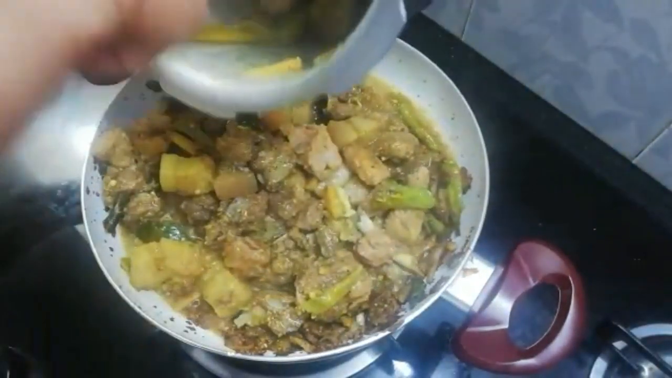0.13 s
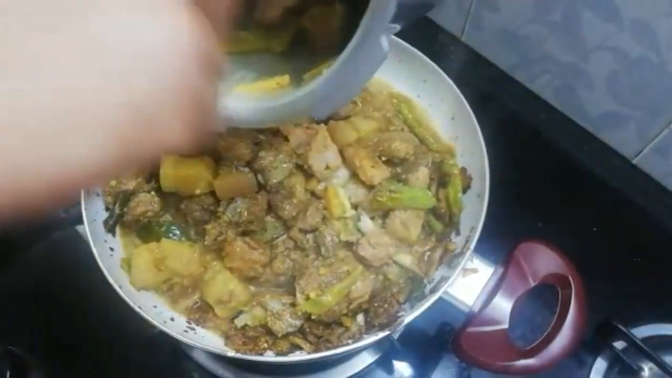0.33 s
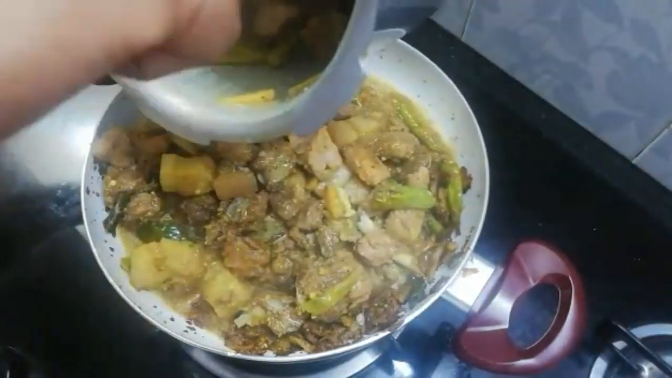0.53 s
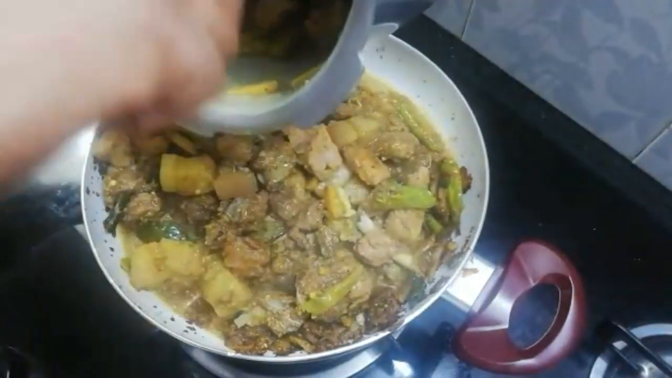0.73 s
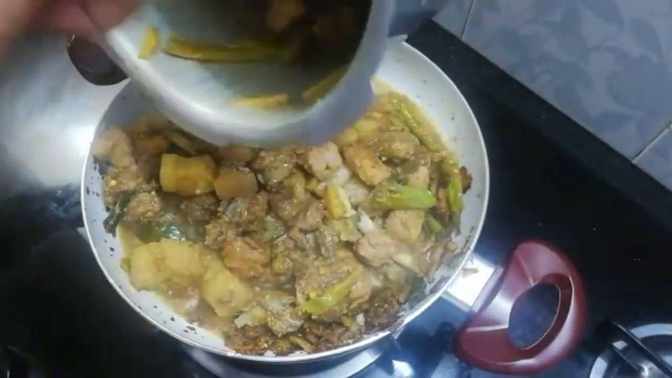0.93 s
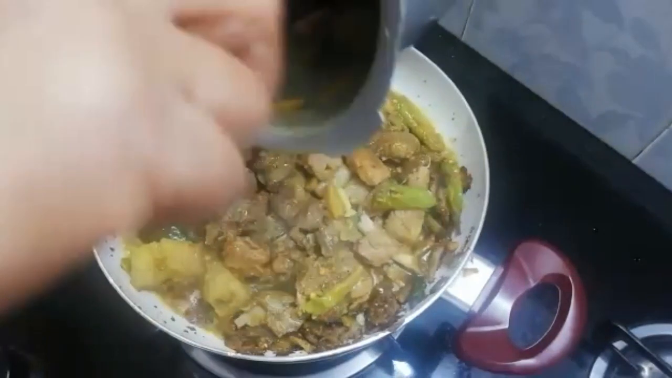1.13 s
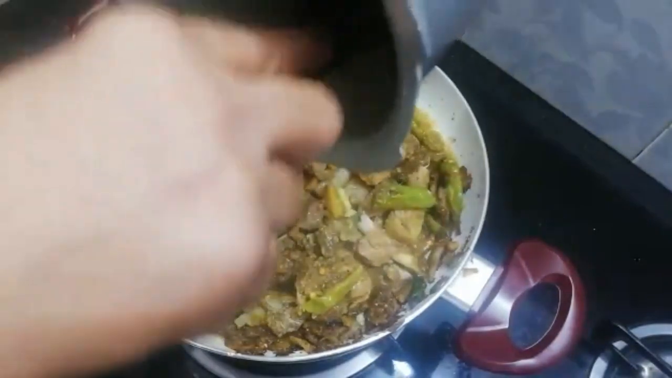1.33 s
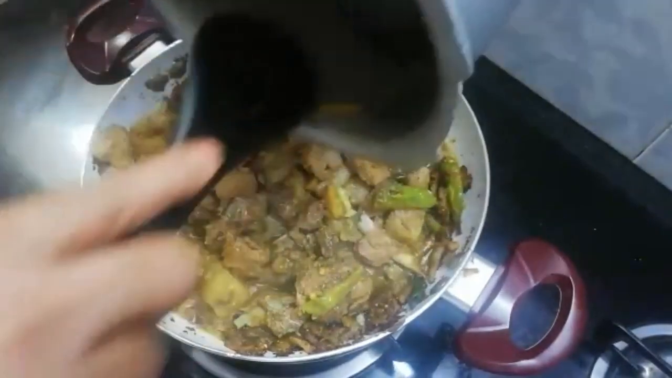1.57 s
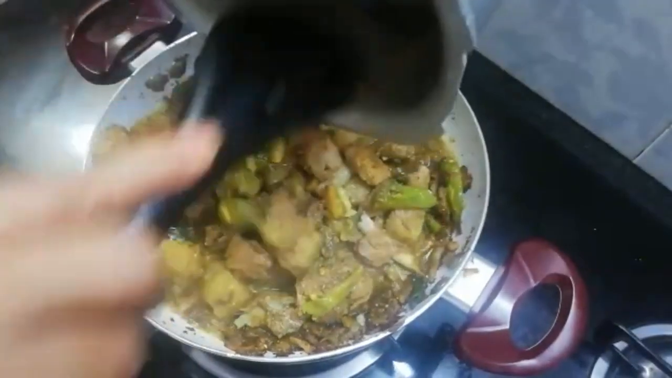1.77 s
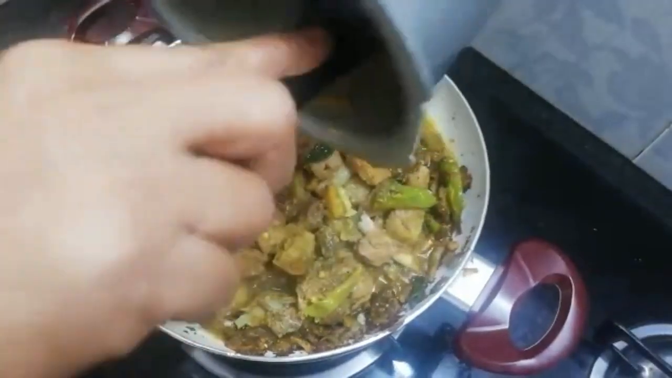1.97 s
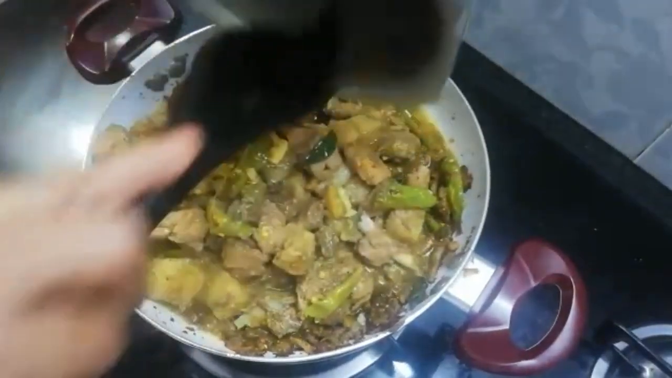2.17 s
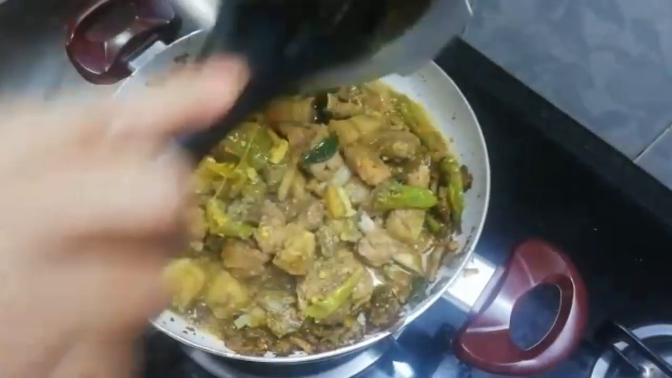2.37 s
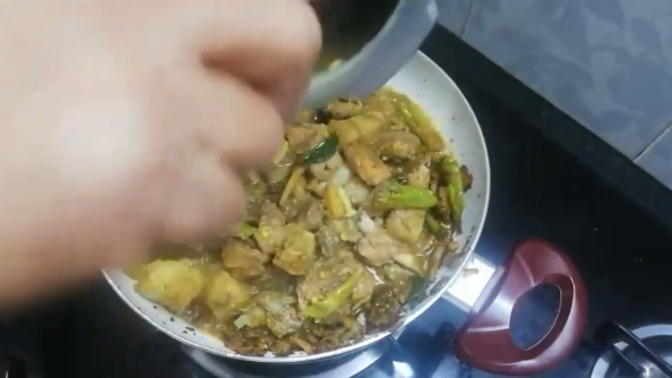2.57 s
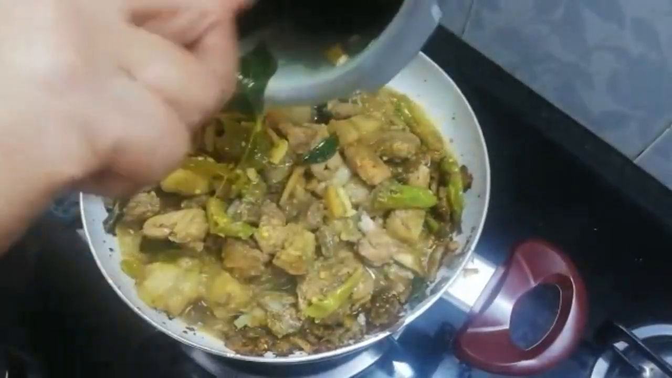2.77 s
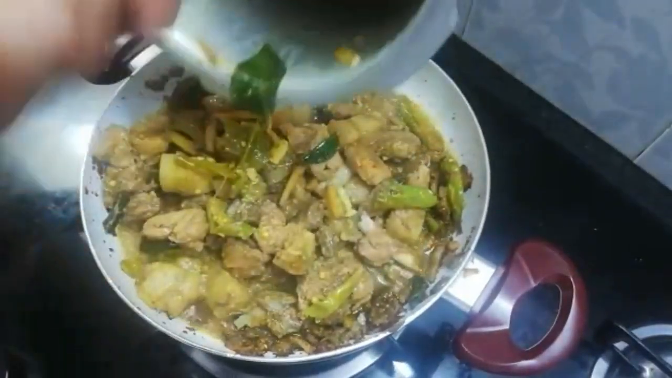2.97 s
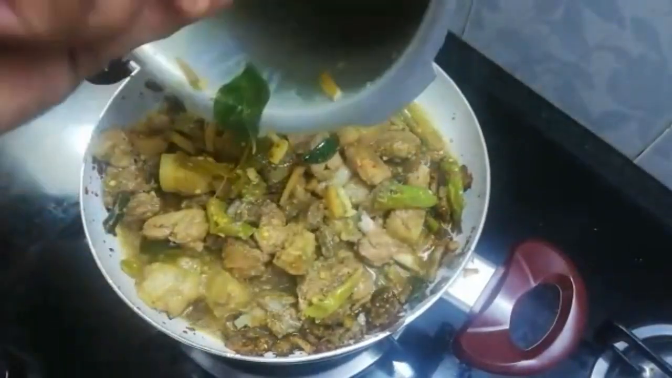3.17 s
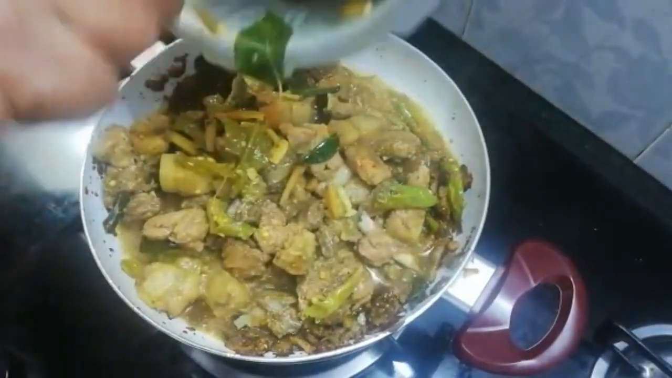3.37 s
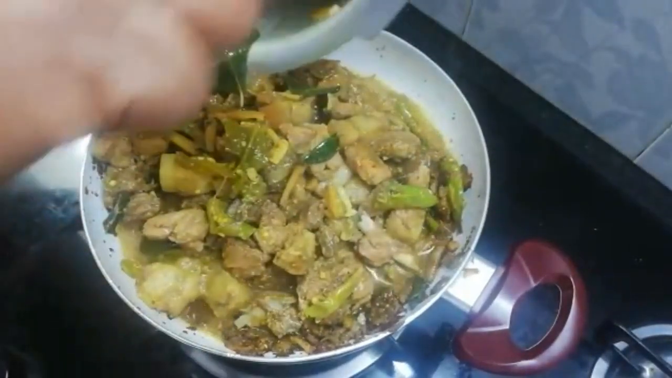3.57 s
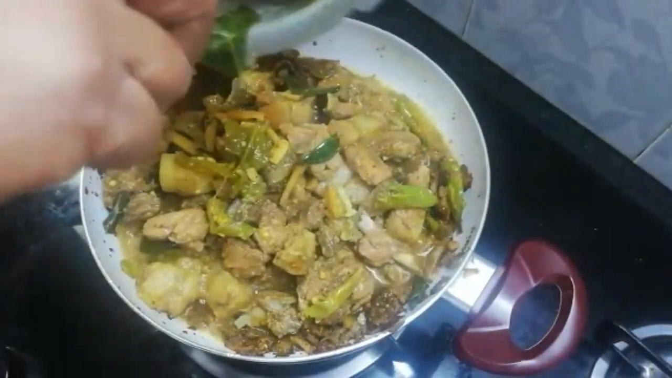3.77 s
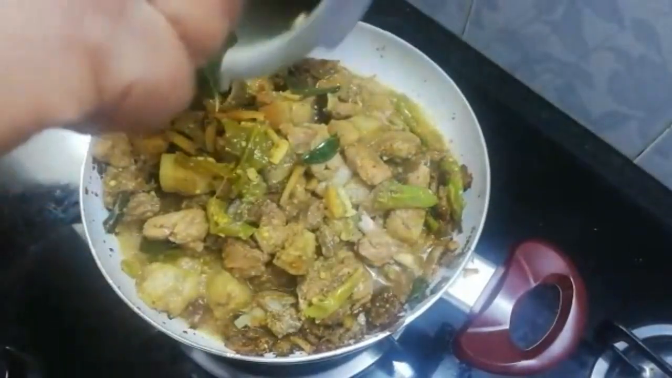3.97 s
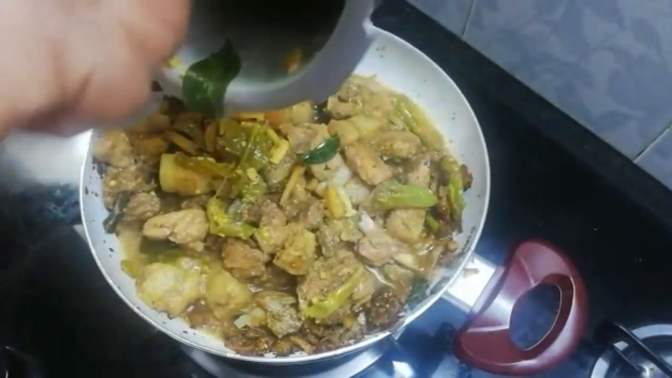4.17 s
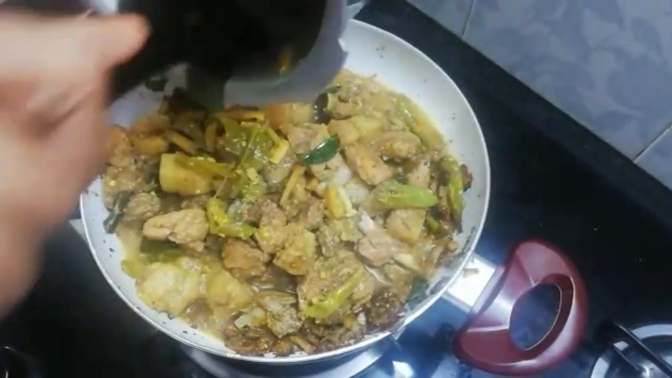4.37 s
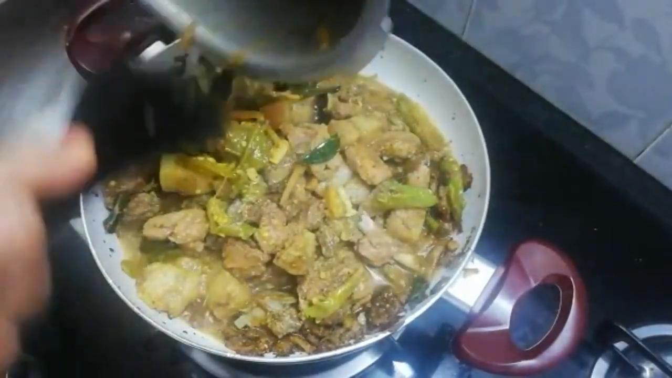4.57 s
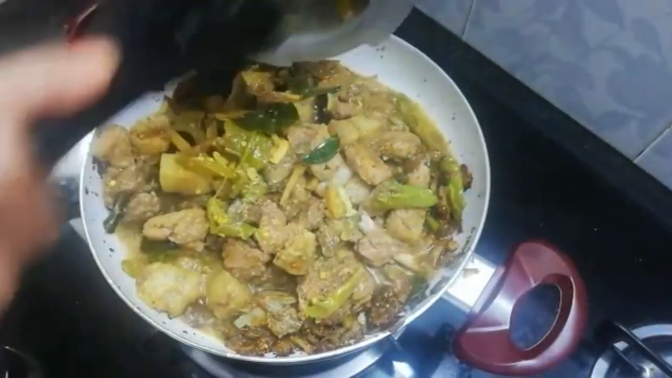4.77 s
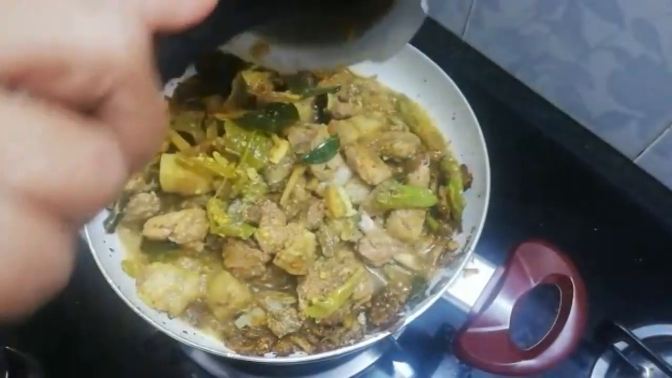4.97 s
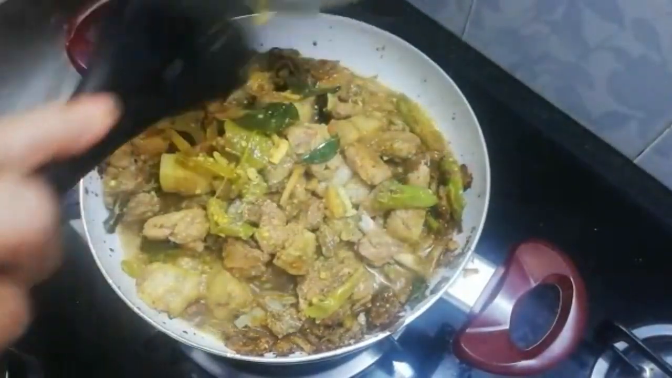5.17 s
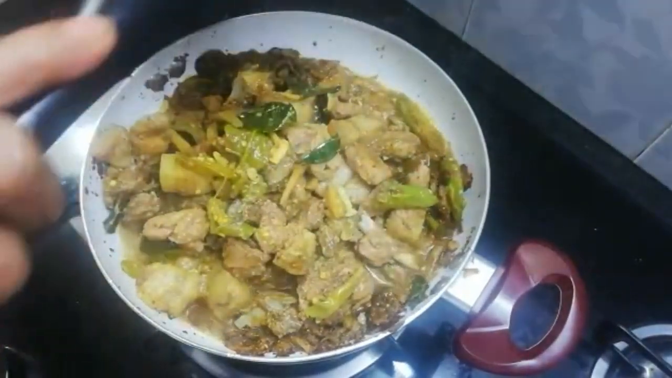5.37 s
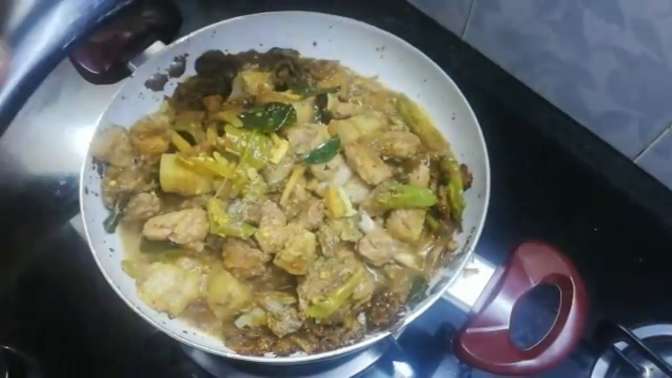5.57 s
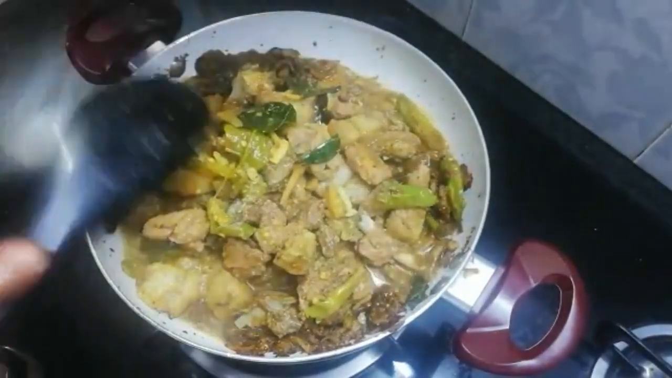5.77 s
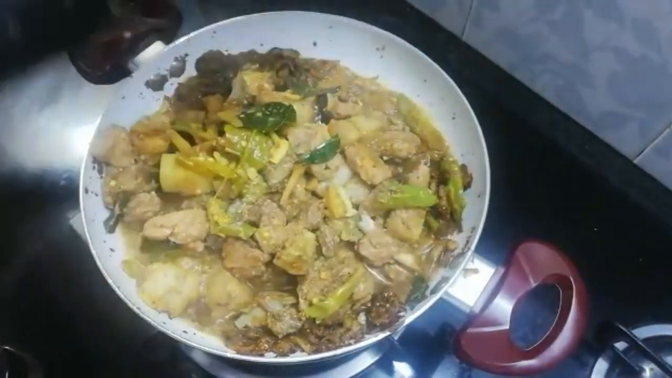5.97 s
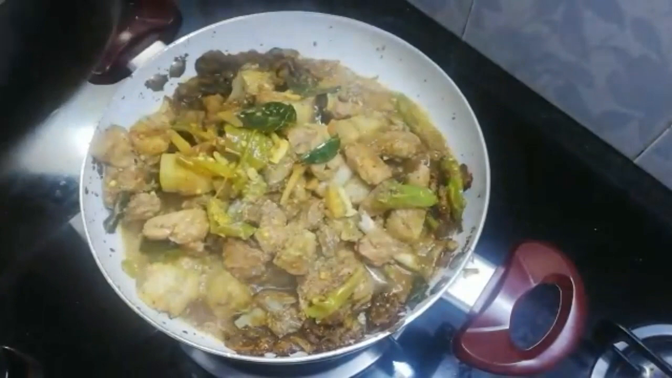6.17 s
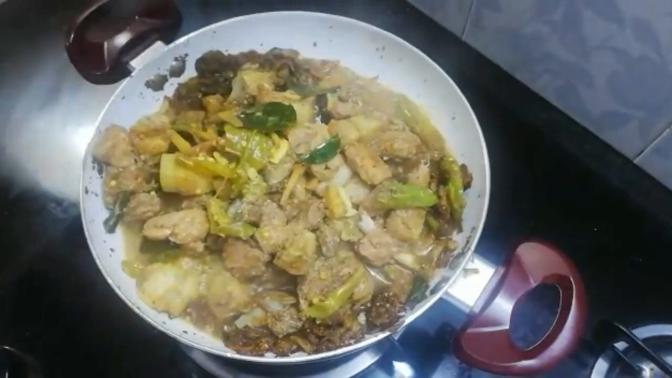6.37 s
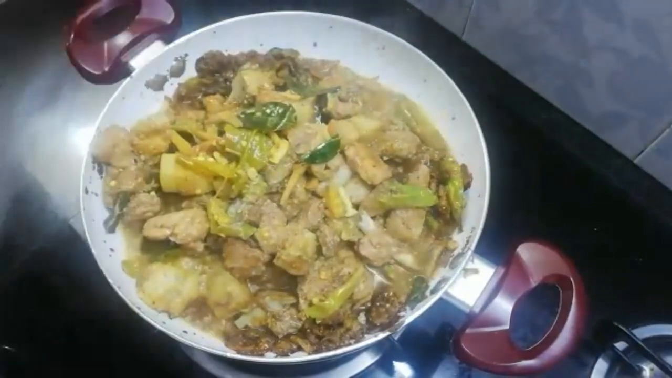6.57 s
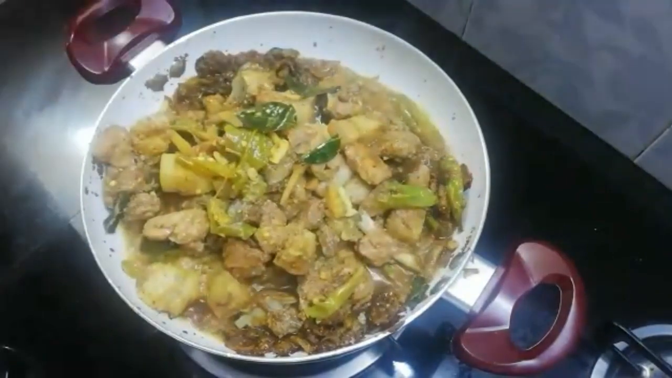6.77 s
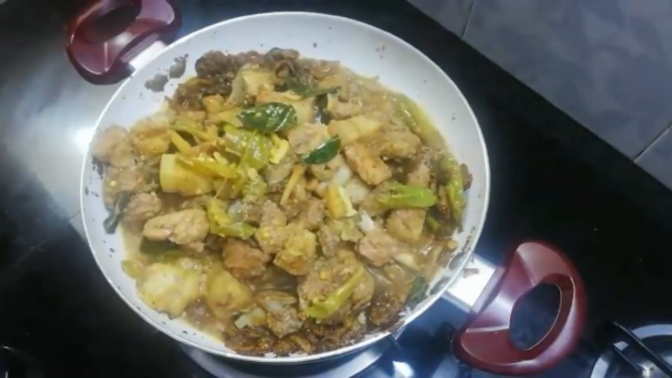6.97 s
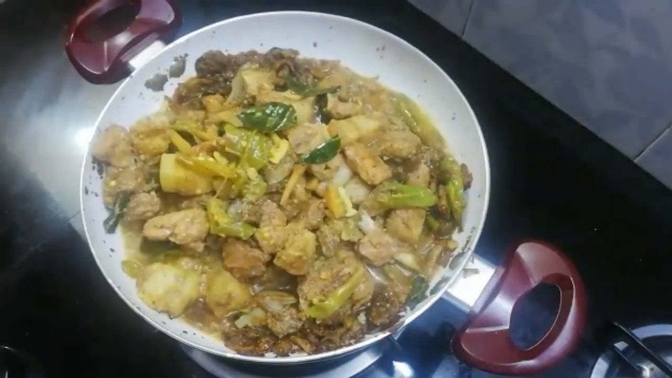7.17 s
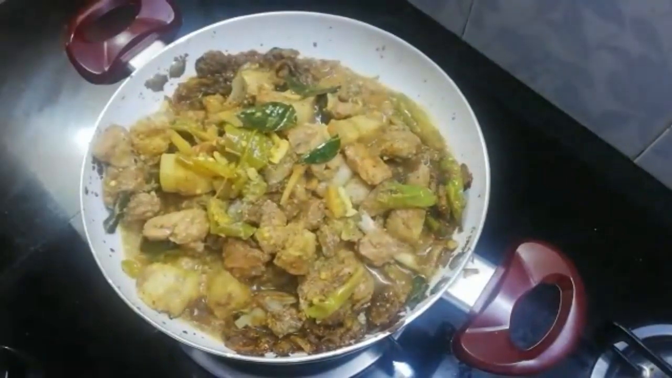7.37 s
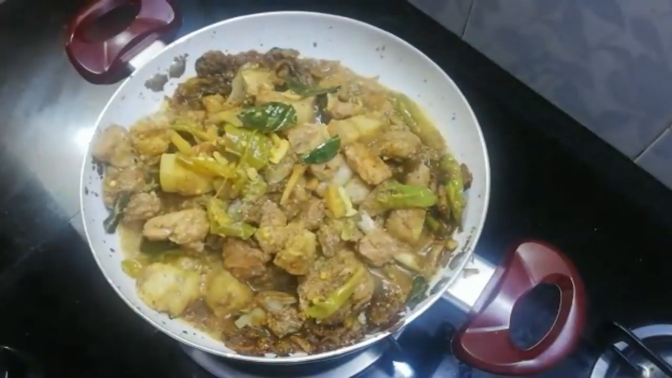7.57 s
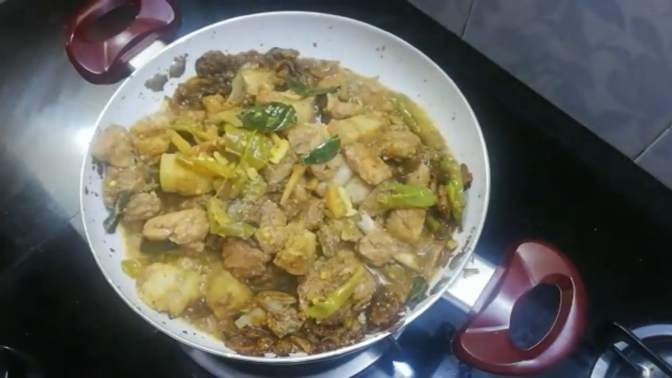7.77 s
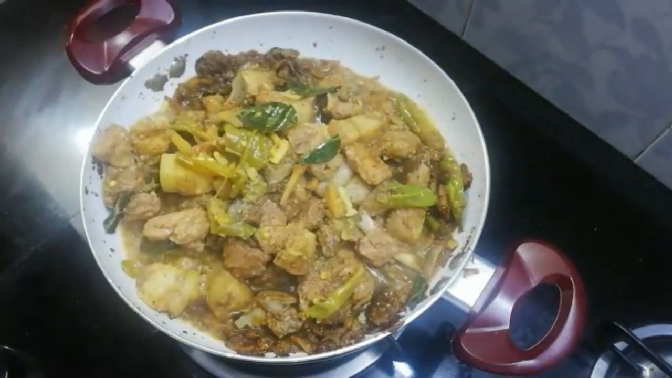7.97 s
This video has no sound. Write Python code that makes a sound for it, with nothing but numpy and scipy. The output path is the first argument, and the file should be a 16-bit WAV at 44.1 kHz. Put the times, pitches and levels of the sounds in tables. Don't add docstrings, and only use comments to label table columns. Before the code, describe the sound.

A close handheld stereo pickup hears a pan frying, hissing and spitting, with a low murmur of flame underneath. Over it, a ladle empties a hand-damped metal pot: rasping scrapes, sharp taps, short squeaky singing tones, clustered and irregular. The pot then lands on the counter with a clear clang, followed by a quick fierce hiss and quieter sizzling in the tiled room.

```python
import sys
import numpy as np
from scipy import signal
from scipy.fft import rfft, irfft, next_fast_len
from scipy.io import wavfile
from scipy.ndimage import uniform_filter1d, map_coordinates

SR = 44100
rng = np.random.default_rng(int(sys.argv[2]) if len(sys.argv) > 2 else 0)


def to_wav(s):
    ch = np.atleast_2d(s).T
    pcm = np.round(np.clip(ch, -1, 1) * 32767)
    wavfile.write(sys.argv[1], SR, pcm.astype(np.int16))


def voltage_ratio(decibels):
    exponent = np.asarray(decibels, float) / 20
    return 10 ** exponent


N = 353285

BAND_HZ = [550, 1800, 4900, 9500]

# start_s, level_db
HEAT = [(0.0, -42), (0.24, -30), (0.42, -36), (0.76, -29.5), (0.89, -31.5), (1.43, -35.5), (1.69, -33),
        (2.9, -35.5), (4.46, -35.5), (4.93, -36.5), (5.89, -37.5), (6.09, -38.5), (6.94, -37.5), (7.3, -39),
        (8.01, -39.5)]
# pitch_hz, level_db (per Hz)
FIZZ_COLOUR = [(180, -16), (300, -4.5), (385, -12), (585, -9), (726, -11), (764, -5.5), (997, -7.5),
               (1220, -4), (1940, -6), (2220, -6), (5030, -4), (5650, -5.5), (9170, 0.5), (15100, -15.5),
               (16200, -28)]
# start_s, level_db
FLARE = [
    (7.25, -59),
    (7.348, -29.5),
    (7.522, -26.5),
    (7.602, -30.5),
    (7.75, -47),
]
# pitch_hz, level_db (per Hz)
FLARE_COLOUR = [(290, -49), (500, -16), (587, -16.5), (1050, -11.5), (1580, -4.5), (3170, -8), (3510, -9),
                (4240, -13), (7370, -11), (9440, -2.5), (16200, -27)]
# pitch_hz, likeness (0-1)
LIKENESS = [(60, 0.91), (130, 0.97), (290, 0.77), (640, 0.037), (1410, 0.54), (3100, 0.087), (6820, 0.2),
            (15000, 0.18)]
# pitch_hz, level_db (per Hz)
RUMBLE_COLOUR = [(12, -47), (20, -14.5), (97, -8), (183, -2), (232, -15.5), (267, -15), (351, -22.5),
                 (380, -55), (405, -46), (450, -37), (580, -56), (990, -120)]
# start_s, level_db
SIMMER = [(0.0, -54), (0.89, -50), (1.47, -55), (1.78, -47), (2.07, -53.5), (5.78, -50), (6.07, -55),
          (6.6, -50), (8.01, -53.5)]

# firmest_s, release_s, pressure_db,
# depth (0 wall - 1 floor), edge_db (sharp edge above 0, flat bowl below)
STROKES = [(0.003, 0.03, -12, 0.33, -0.5), (0.033, 0.032, -25.5, 0.73, -2.5),
           (0.065, 0.05, -13.5, 0.058, -4.5), (0.392, 0.068, -21.5, 0.089, -6),
           (0.424, 0.021, -27, 0.68, 3), (0.54, 0.041, -40.5, .6, -11.5), (0.632, 0.069, -29, 0.49, 4),
           (0.774, 0.13, -32.5, 0.62, 2), (0.93, 0.13, -32.5, .1, 14), (1.076, 0.062, -29.5, 0.6, -3.5),
           (3.343, 0.027, -13, 0.2, 1), (3.383, 0.026, -15, 0.07, 9), (3.7, 0.049, -42, 0.97, 1),
           (3.736, 0.055, -28.5, 0.66, -6.5), (3.775, 0.13, -34, 0.61, -1), (4.142, 0.042, -30.5, 0.65, 5),
           (4.372, 0.2, -33.5, 0.091, 1), (4.441, 0.22, -31.5, 0.17, -3.5), (4.599, 0.071, -35, 0.1, -3),
           (5.161, 0.046, -36.5, 0.29, -20.5), (5.231, 0.029, -26.5, 0.089, -11.5),
           (5.701, 0.1, -27.5, 0.076, -2.5), (5.747, 0.0092, -22.5, 0.12, -7), (6.06, 0.04, -30.5, 0.24, 1)]
# start_s, pitch_hz, peak_db, t60_s
ACCENTS = [(0.014, 4660, -7, 0.065), (0.012, 492.6, -12.5, 0.31), (0.06, 1590, -13.5, 0.12),
           (0.316, 4190, -8.5, 0.05), (0.317, 515, -12, .05), (0.329, 4650, -19, 0.056),
           (0.957, 1437, -21.5, 0.17), (0.957, 5450, -21, 0.095), (0.978, 493, -16, 0.067),
           (5.959, 5460, -22, 0.21), (2.667, 2030, -22, 0.34), (2.674, 4120, -22, .25),
           (2.674, 613, -15, .06), (2.894, 2140, -12, 0.33), (2.894, 679, -30, 0.14),
           (3.143, 1280, -18, 0.11), (3.175, 267, -20, 0.16), (3.177, 4200, -17, .18),
           (3.638, 1437, -16.5, 0.1), (3.639, 1026, -21, .08), (3.722, 2050, -19, 0.25),
           (3.737, 1613, -15, 0.19), (3.735, 465, -19.5, 0.53), (3.755, 2890, -18, .08),
           (4.036, 248, -22, 0.16), (5.136, 1708, -16, 0.15), (5.136, 4590, -12, 0.055),
           (5.198, 1760, -14, .06), (5.236, 1573, -7, 0.078), (5.25, 1675, -12.5, 0.04),
           (5.505, 2040, -18, 0.13), (5.505, 1650, -23, 0.22), (5.683, 5450, -15.5, 0.12),
           (5.684, 8737, -34, 0.22), (5.959, 246, -24, 0.12), (5.958, 7530, -14, 0.15),
           (6.864, 263.6, -24, 0.56), (6.925, 4780, -24, .35), (6.928, 5873, -27, 0.25),
           (1.287, 1613, -20.5, 0.41), (1.287, 2326, -19, .5), (1.287, 4480, -26, 0.23),
           (1.288, 5420, -28, 0.35), (1.287, 586, -19, 0.23), (2.109, 1658, -17, 0.18),
           (2.109, 582, -15, 0.14), (2.554, 1645, -26, 0.3), (3.143, 1560, -6, 0.043),
           (3.143, 4710, -8, 0.075), (4.035, 4175, -32, 0.27)]
# start_s, pitch_hz, peak_db, t60_s
TWINS = [
    (6.863, 2955, -13, 0.4),
    (6.863, 4770, -23.5, 0.52),
    (6.863, 4204, -13.5, 0.47),
    (6.863, 5873, -23, 0.34),
]
TWIN_THROBS = [2.75, 3.0, 9.5, 3.1]
# middle_s, length_s, pitch_hz, level_db
SINGING = [(0.043, .07, 528, -20.5), (0.06, 0.086, 4480, -25), (1.07, .09, 4400, -27.5),
           (1.076, .05, 5300, -30), (1.04, .15, 1570, -31), (1.073, .03, 1300, -26), (1.2, 0.052, 467, -36),
           (2.8, 0.17, 387, -36), (2.759, 0.15, 600, -33), (3.2, .16, 2130, -26), (3.366, 0.1, 2500, -31),
           (3.356, .06, 3200, -33), (3.1, .1, 1530, -30), (3.82, .22, 540, -29.5), (4.37, .08, 5400, -39),
           (4.445, .08, 4600, -36), (4.461, 0.12, 4800, -30), (4.465, .09, 3040, -27.5),
           (4.52, .09, 1580, -36), (4.578, .06, 1640, -29.5), (4.63, .06, 1580, -33.5),
           (4.582, .06, 772, -33), (5.2, .15, 1000, -31), (5.22, .08, 4720, -37), (5.224, .08, 760, -30),
           (3.77, .18, 5870, -35), (4.2, 0.11, 720, -30), (4.145, .07, 4200, -30), (0.47, 0.089, 950, -35),
           (5.19, 0.15, 2330, -28), (4.15, .08, 5850, -31.5), (7.115, .14, 2950, -34),
           (7.0, 0.28, 1600, -43.5), (5.739, .05, 8800, -27), (5.745, .05, 7000, -30)]
# middle_s, length_s, pitch_hz, level_db
SHORT_TONES = [(0.04, .07, 3300, -29), (0.46, .09, 4150, -33), (0.385, .06, 3000, -31),
               (0.49, .12, 1500, -31), (1.1, .13, 2030, -37), (1.44, .2, 1600, -33), (1.39, .12, 4500, -33),
               (1.38, .12, 4980, -39), (3.82, .11, 2030, -32), (3.85, .17, 455, -28), (4.06, .06, 5450, -34),
               (4.06, .06, 4780, -34), (4.09, .12, 2900, -35), (5.6, .12, 1620, -35), (6.93, .06, 1480, -34),
               (0.43, .022, 1050, -17), (0.465, .025, 950, -26), (0.32, .016, 520, -17),
               (3.19, .05, 4780, -26), (3.35, .035, 4550, -22), (3.39, .03, 4500, -25),
               (1.36, .14, 2850, -33), (5.2, .13, 2950, -35), (4.2, .13, 2950, -39), (1.0, .04, 2950, -34),
               (7.06, .08, 5950, -41), (3.05, .12, 2100, -36), (0.428, .022, 760, -18),
               (6.09, .025, 4500, -28)]

# start_s, blow_db, then against the blow hollow_db, clang_db, tick_db
WALL_KNOCKS = [(0.316, -20.5, 2, -19, -7), (0.327, -11, -14, -3, 1.5), (0.42, -30, 15, -18, -1),
               (0.957, -25, -12, -2, 12), (0.984, -31, 7.5, -7, -10), (1.287, -10, -30, 0, 6),
               (2.109, -13, -26, 0.5, 0), (2.555, -29.5, -10, 10, 2.5), (3.143, -10, -37, -3.5, -25),
               (3.155, -19, -4.5, -13, 4.5), (3.333, -45, 15.5, -10, 21), (5.135, -20.5, -6.5, 4.5, -12),
               (5.684, -25, -5.5, 2.5, 6.5), (5.959, -15.5, -11, -6, 3.5), (6.082, -25.5, -10, -7.5, 1.5)]
# start_s, blow_db, hollow_db, clang_db, tick_db
RIM_KNOCKS = [
    (2.893, -23.5, -10.5, 10, -1),
    (5.505, -19, -27, 1, -17),
]
# start_s, blow_db, hollow_db, clang_db, tick_db
FLOOR_KNOCKS = [
    (2.666, -20.5, 4.5, -3, -4),
    (2.674, -28.5, -7, 6, 5),
    (3.177, -19, -2, -20, 4),
    (3.626, -32, -13, -6, -1),
    (3.64, -15.5, -2, -17, 0.5),
    (3.722, -25, -23, -16, -25),
    (4.035, -26.5, 4.5, 1, -8),
    (4.157, -39, 10.5, -7, -10),
]
# start_s, blow_db, hollow_db, clang_db, tick_db
LADLE_KNOCKS = [
    (0.425, -20, 20.5, 11, 4),
    (1.071, -26, 12, 10.5, -1),
    (2.109, -36, -25, 10, -4),
    (3.735, -19, -21, 0.5, -4),
    (5.224, -24, 4, 8, -1),
    (5.238, -34, -9, -2, -6),
    (5.251, -24, -15, 1, -8),
]
# start_s, blow_db, hollow_db, clang_db, tick_db
LANDING = [
    (6.863, -9.5, -36, -5.5, -16),
    (6.871, -23, -22, 13.5, 7),
    (6.887, -42.5, 32, -3, 25),
]
POT_HZ = [350, 459, 500, 577, 650, 770, 1030, 1400, 1500, 1585, 1690, 2022, 2150, 2280, 2750, 2948, 3323,
          4175, 4445, 4683, 4780, 4972, 5450, 5900, 6930, 7510, 8020, 8590, 9350, 9740]
# t60_s, wall_db, rim_db, floor_db (level when struck there)
POT_MODES = [(0.55, -14.5, 5.5, -25), (1, -19, -8, -15), (0.15, -4.5, 21.5, 12.5), (0.27, 4, 6, -8),
             (0.24, -13, -32, 3), (0.32, -10.5, -19, -19), (0.18, -6, -33, -40), (0.69, -42, -39, -39),
             (0.3, -18, -12, -29), (0.31, -1.5, -3.5, -15), (0.12, -0.5, 3.5, -30), (0.28, -28, -2, 8.5),
             (0.056, -38, 13, -25), (0.11, 1.5, -16, 3), (0.15, -6, -4, -35), (0.13, -3.5, 6.5, 13.5),
             (0.14, -6.5, -24, -34), (0.14, -8.5, -2.5, 10), (0.08, 6.5, 3, 5), (0.14, -4, -40, -27),
             (0.21, -14, -3.5, -1), (0.2, -6.5, -24, -38), (0.17, -6.5, -11, -13), (0.23, -44, -32, -2.5),
             (0.11, -45, -30, -25), (0.14, -3, -18, -24), (0.029, 1.5, 4, 14), (0.19, -12, -1, -0.5),
             (0.13, -3, -38, -29), (0.053, -2.5, -7, 1.5)]
LADLE_HZ = [500, 595, 760, 990, 1200, 1430, 1565, 1650, 1730]
# t60_s, level_db
LADLE_MODES = [(0.22, -7), (0.1, -4), (0.2, -8), (0.11, 3), (0.092, 0), (0.23, 3), (0.16, 7), (0.14, -13),
               (0.11, -20)]
FREE_HZ = [1351, 2024, 2893, 2950, 2958, 4171, 4203, 4768, 5870, 6100, 7150, 8170, 8863, 9270, 9620, 9985,
           11030, 11230, 11820]
# t60_s, level_db
FREE_MODES = [(0.5, -18), (0.2, -1), (0.2, -12), (0.092, 8.5), (0.1, -30), (0.15, 9), (0.1, -30),
              (0.1, -30), (0.1, -30), (.3, -17), (.2, -23), (0.2, 4), (0.2, 2.5), (0.183, -21.5), (0.27, 2),
              (0.13, 7), (0.18, 0), (0.16, 9), (0.15, 5)]
SHIMMER_DB = [
    [-4],
    [-2],
    [-2.5],
    [-2.5],
]

# start_s, peak_db, pitch_hz
POPS = [(0.607, -11.5, 9100), (0.631, -16, 9040), (0.8698, -11, 7200), (1.1098, -8, 10000),
        (1.2466, -9, 9700), (1.6304, -16, 9230), (1.734, -8, 9700), (1.901, -7, 6500), (2.2563, -11, 9800),
        (2.379, -8, 8700), (2.778, -18, 7870), (2.8402, -13.5, 9100), (2.9806, -24, 8600),
        (4.4487, -8, 10000), (4.484, -14, 9300), (4.749, -12, 9700), (5.0549, -41, 9200),
        (5.3045, -13, 10200), (5.366, -20, 9000), (5.5872, -11, 9700), (6.3813, -14, 9600),
        (6.427, -19, 9290), (6.4452, -14.5, 5450), (0.576, -11, 9100), (5.373, -15, 8400),
        (5.383, -11, 9200), (5.676, -16, 8900), (7.1207, -17.5, 7920), (7.524, -12, 9800),
        (7.7515, -17, 9030)]

# pitch_hz, level_db
NEAR_COLOUR = [(40, -58), (150, -18), (330, -9), (450, -5), (1000, -5), (3550, -2), (3880, -9), (4100, -1),
               (10000, 1), (12500, -6), (16000, -11.5)]
# start_s, right port delay (samples), left minus right_db
POT_PLACE = [(0, 1.14, 3), (.7, 0.98, 5.5), (1.3, 1.16, 1), (2.1, -0.56, -1), (2.8, -0.23, 6),
             (3.2, 0.89, 2), (3.7, 0.074, 5.5), (4.1, 1.2, 5), (4.6, -0.64, 5), (5.2, 0.97, 5.5),
             (5.7, -0.31, 2), (6, -0.47, 3.5), (6.9, -0.29, 6), (8.01, 0.3, -2)]
# pitch_hz, t60_s
KITCHEN_DECAY = [(300, 0.35), (1500, 0.45), (5000, 0.35), (12000, 0.21)]
# pitch_hz, phase (radians)
PORT_PHASE = [(0, 0), (260, -0.2), (520, 2.3), (950, 0.5), (1550, 0.4), (2070, 2.1), (2580, 3.1),
              (3620, 0.8), (5080, 6.6), (6980, 6.0), (8870, 11.2), (11800, 13.0), (14000, 11.2),
              (15800, 3.9)]
# pitch_hz, left minus right_db
PORT_BALANCE = [(60, 2.5), (110, -1), (200, 0), (380, -0.5), (700, 5), (1290, -2.5), (2380, 0), (4400, 0.5),
                (8120, 2.5), (15000, -0.5)]


def evened(x):
    return x / np.sqrt(np.mean(x ** 2) + 1e-20)


def drift(shape, width, passes=1):
    motion = rng.standard_normal(shape)
    for _ in range(passes):
        motion = uniform_filter1d(motion, width)
    return evened(motion)


def read(points, hz):
    f, value = np.transpose(points)
    return np.interp(np.log(hz + 1), np.log(f + 1), value)


def shaped(x, gain):
    size = next_fast_len(N)
    return irfft(rfft(x, size) * gain(np.fft.rfftfreq(size, 1 / SR)), size)[..., :N]


def coloured(x, table):
    return shaped(x, lambda hz: voltage_ratio(read(table, hz)))


def level(rows):
    s, *columns = np.transpose(rows)
    t = np.arange(N) / SR
    return np.array([voltage_ratio(np.interp(t, s, c, left=-120, right=-120)) for c in columns])


def band_shares(hz):
    return np.array([read(list(zip(BAND_HZ, row)), hz) for row in np.eye(len(BAND_HZ))])


def crackle(per_s, spread_db, shape):
    size = voltage_ratio(spread_db * np.minimum(rng.exponential(1, shape), 5))
    return size * rng.choice([-1., 1.], shape) * (rng.random(shape) < per_s / SR)


def resonator(hz, r):
    return [1, -2 * r * np.cos(2 * np.pi * hz / SR), r * r]


def ring(drive, pitches, modes, stages, wobble):
    out, flat = np.zeros(N), drive.reshape(-1, N)
    sway = drift(N, 700, passes=2)
    for hz, (t60, *spots_db), (lag, turn) in zip(pitches, modes, rng.random((len(modes), 2))):
        push = np.outer(voltage_ratio(np.array(spots_db)), band_shares(hz)).ravel() @ flat
        tone = np.zeros(N)
        for db, damping in stages:
            r = np.exp(-np.log(1000) * damping / (t60 * SR))
            gain = voltage_ratio(db) * np.sin(2 * np.pi * hz / SR)
            tone += signal.lfilter([0, gain], resonator(hz, r), push)
        tone = np.roll(tone, int(lag * 150))
        out += tone * (1 + wobble * np.roll(sway, int(turn * N)))
    return out


def spread(x):
    same = lambda hz: np.clip(read(LIKENESS, hz), 0, 1)
    private = lambda hz: np.sqrt(1 - same(hz) ** 2)
    return np.array([x[0], shaped(x[0], same) + shaped(x[1], private)])


def sizzle(colour, per_s, spread_db, grain_db, flicker_db):
    clumps = voltage_ratio(flicker_db * drift(N, 500))
    hiss = rng.standard_normal((2, N))
    clicks = abs(crackle(per_s, spread_db, (2, N)))
    puffs = signal.lfilter([1], [1, -np.exp(-1 / (0.0014 * SR))], clicks)
    bursts = hiss * (1 + voltage_ratio(grain_db) * evened(puffs)) * clumps
    treble = lambda hz: 1 / (1 + (2700 / (hz + 1)) ** 4)
    both = shaped(evened(bursts), treble) + shaped(hiss, lambda hz: 1 - treble(hz))
    return evened(coloured(spread(both), colour))


def rumble():
    lumps = voltage_ratio(3.2 * drift(N, 900))
    low = coloured(spread(rng.standard_normal((2, N)) * lumps), RUMBLE_COLOUR)
    return voltage_ratio(3.0) * level(SIMMER) * evened(low)


def strokes():
    press_share, lift_db = 0.85, -22.5
    on_wall, on_rim, on_floor = 0.54, 0.032, 0.59
    slips = evened(crackle(4000, 2.9, N))
    drive, rasp = np.zeros((3, len(BAND_HZ), N)), np.zeros((len(BAND_HZ), N))
    rasp_gain = voltage_ratio(np.array([[-38.5], [0], [0], [0]]))
    for s, release_s, press_db, depth, edge_db in STROKES:
        span = slice(max(round((s - .3) * SR), 0), round((s + .4) * SR))
        late = (np.arange(span.start, span.stop) / SR - s) / release_s
        contact = voltage_ratio(press_db + lift_db * np.maximum(late, -late / press_share)) * slips[span]
        hollow_db = -22.5 + 37 * depth - edge_db
        clang_db, tick_db = -2 - edge_db, 1 + 0.081 * edge_db
        bands = np.outer(voltage_ratio(np.array([hollow_db, clang_db, 0, tick_db])), contact)
        deep = np.clip(depth, 0, 1)
        spots = np.array([on_wall * (1 - deep), on_rim, on_floor * deep])
        drive[:, :, span] += spots[:, None, None] * bands
        rasp[:, span] += bands * rasp_gain
    tilt = np.sqrt(SR / 2 / np.array(BAND_HZ))[:, None]
    rung = ring(drive, POT_HZ, POT_MODES, [(-23.0, 5.6), (-41.0, 4.1)], wobble=0)
    return rung + voltage_ratio(-5.0) * shaped(rasp * tilt, band_shares).sum(0)


def accents():
    out, t = np.zeros(N), np.arange(SR // 2) / SR
    rows, throbs = ACCENTS + TWINS, [0] * len(ACCENTS) + TWIN_THROBS
    sway = 0.35 * drift((len(rows), 2, len(t)), round(0.012 * SR), passes=2)
    rise = 1 - np.exp(-t / 0.00026)
    for (s, hz, db, t60), throb, (swell, slip) in zip(rows, throbs, sway):
        tone = voltage_ratio(db - 60 * t / t60) * np.sin(2 * np.pi * hz * t + slip) * np.cos(np.pi * throb * t)
        out[round(s * SR):][:len(t)] += tone * (1 + swell) * rise
    return out


def singing(rows):
    out, r = np.zeros(N), np.exp(-np.pi * 27 / SR)
    for (s, length, hz, db), slips in zip(rows, rng.standard_normal((len(rows), SR // 2))):
        tone = signal.lfilter([1], resonator(hz, r), slips)[-round(length * SR):]
        start = max(round((s - length / 2) * SR), 0)
        out[start:][:len(tone)] += voltage_ratio(db) * evened(tone) * np.hanning(len(tone))
    return out


def knocks(spots, pitches, modes, ring_db, thud_db, crack_db, shimmer_db, shimmer_s):
    blows, noise = np.zeros((len(spots), len(BAND_HZ), N)), np.zeros((len(BAND_HZ), N))
    t = np.arange(SR // 4) / SR
    crack = voltage_ratio(crack_db) * np.exp(-t / 0.0059)
    shimmer = voltage_ratio(shimmer_db + np.array(SHIMMER_DB)) * np.exp(-t / shimmer_s)
    fading = (crack + shimmer) * (1 - np.exp(-t / 0.001))
    for spot, rows in enumerate(spots):
        hisses = rng.standard_normal((len(rows), len(t)))
        for (s, blow_db, hollow_db, clang_db, tick_db), hiss in zip(rows, hisses):
            at = round(s * SR)
            gains = voltage_ratio(blow_db + np.array([hollow_db, clang_db, 0, tick_db]))
            blows[spot, :, at] += gains
            noise[:, at:at + len(t)] += gains[:, None] * hiss * fading
    rung = ring(blows, pitches, modes, [(ring_db, 1.), (thud_db, 5.)], wobble=0.38)
    return rung + shaped(noise, band_shares).sum(0)


def pot_knocks():
    return knocks([WALL_KNOCKS, RIM_KNOCKS, FLOOR_KNOCKS], POT_HZ, POT_MODES, ring_db=-22.5, thud_db=5.0,
                  crack_db=4.5, shimmer_db=-6.0, shimmer_s=0.064)


def ladle_knocks():
    return knocks([LADLE_KNOCKS], LADLE_HZ, LADLE_MODES, ring_db=-19.5, thud_db=-10.5,
                  crack_db=-46, shimmer_db=-23, shimmer_s=.02)


def pops():
    out, t = np.zeros((2, N)), np.arange(200) / SR
    noises, places = rng.standard_normal((len(POPS), len(t))), rng.integers(0, 12, (len(POPS), 2))
    for (s, peak_db, hz), noise, lags in zip(POPS, noises, places):
        click = np.sin(2 * np.pi * hz * t) * np.exp(-t * hz / 3.3)
        splash = np.diff(noise, prepend=0) * np.exp(-t / 0.0018)
        drop = voltage_ratio(peak_db + 2.5) * (0.82 * click + 0.18 * splash)
        for port, lag in zip(out, lags):
            port[round(s * SR) + lag:][:len(t)] += drop
    return out


def landing():
    return knocks([LANDING], FREE_HZ, FREE_MODES, ring_db=-16.0, thud_db=-7.5,
                  crack_db=-5.0, shimmer_db=-4.5, shimmer_s=0.075)


def held(x):
    s, lag, pan_db = np.transpose(POT_PLACE)
    n = np.arange(N)
    lag = np.interp(n / SR, s, lag)
    pan = voltage_ratio(np.interp(n / SR, s, pan_db) / 2)
    return np.array([x[0] * pan, map_coordinates(x[1], [n - lag], order=3) / pan])


def kitchen():
    taps = np.zeros((2, SR))
    at = np.arange(200, SR - 20, 20) + rng.integers(0, 20, (2, (SR - 201) // 20))
    np.put_along_axis(taps, at, rng.choice([-1., 1.], at.shape), 1)
    hz, t, z = signal.stft(taps, SR, nperseg=256)
    fade = voltage_ratio(-60 * t / read(KITCHEN_DECAY, hz)[:, None])
    tail = signal.istft(z * fade, SR, nperseg=256)[1]
    return tail / np.linalg.norm(tail[0])


def scene():
    pan = voltage_ratio(3.5) * level(HEAT) * sizzle(FIZZ_COLOUR, per_s=360, spread_db=0.5, grain_db=-2.5, flicker_db=1.0)
    low = rumble()
    pot = strokes() + accents() + singing(SINGING) + pot_knocks() + ladle_knocks() + landing()
    near = coloured(pot + singing(SHORT_TONES) + pops(), NEAR_COLOUR)
    flare = level(FLARE) * sizzle(FLARE_COLOUR, per_s=1500, spread_db=2.0, grain_db=-13, flicker_db=0.0)
    room = voltage_ratio(-5.5) * signal.fftconvolve(near[:1], kitchen(), axes=1)[:, :N]
    return held(near) + room + pan + flare + low


def low_pass(x):
    return signal.sosfilt(signal.butter(12, 15880, fs=SR, output="sos"), x)


def record(dry):
    half = lambda hz: voltage_ratio(read(PORT_BALANCE, hz) / 2) * np.exp(.5j * read(PORT_PHASE, hz))
    ports = np.array([shaped(dry[0], half), shaped(dry[1], lambda hz: 1 / half(hz))])
    power_db = 10 * np.log10(abs(uniform_filter1d((ports ** 2).mean(0), 130)) + 1e-12)
    fall_db = np.arange(N) * 98.0 / SR
    peak_db = np.maximum.accumulate(power_db + fall_db) - fall_db
    over_db = np.maximum(peak_db + 13.5, 0)
    ducked = ports / voltage_ratio(.3 * signal.lfilter([.004], [1, -.996], over_db))
    mix = np.clip(voltage_ratio(0.5) * ducked, -1, 1)
    return low_pass(mix)


dry = scene()
out = record(dry)
to_wav(out)
```